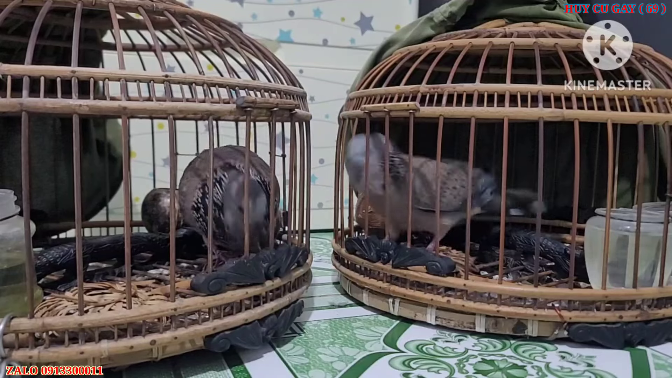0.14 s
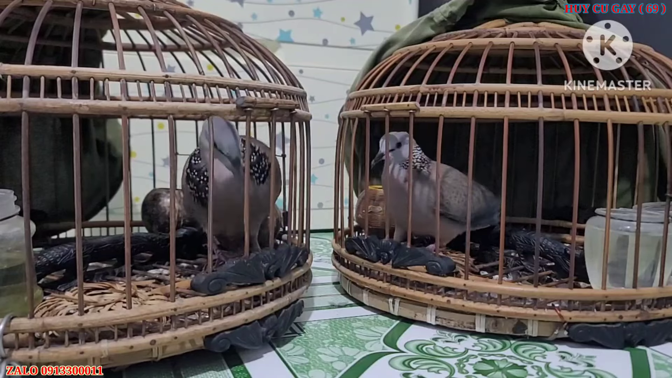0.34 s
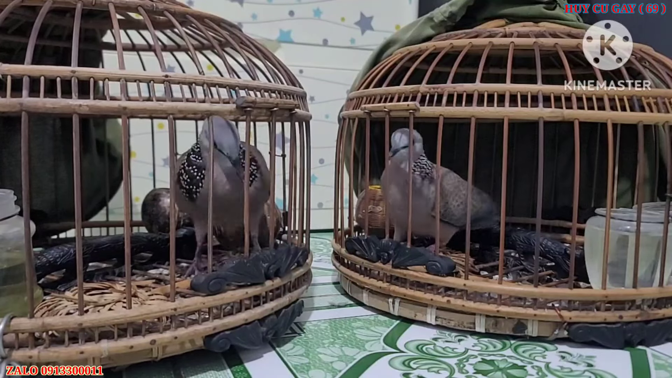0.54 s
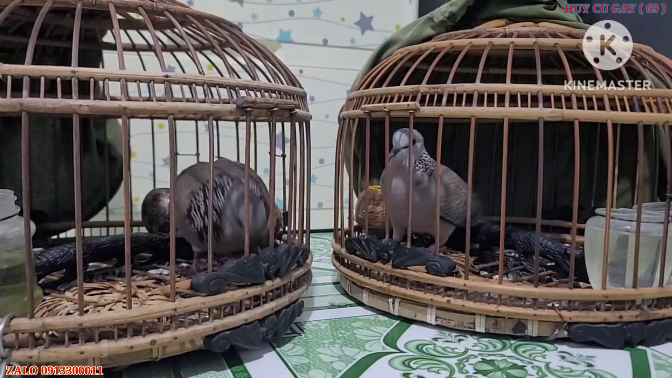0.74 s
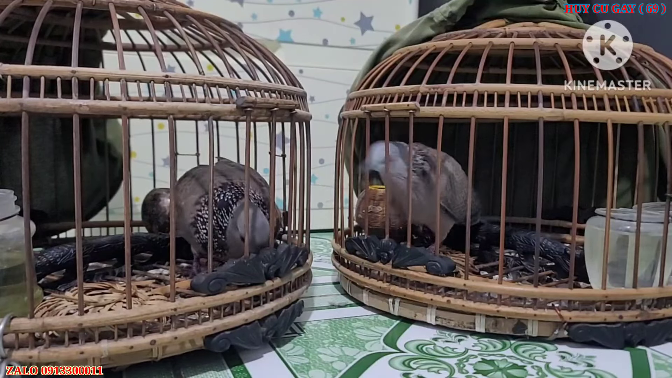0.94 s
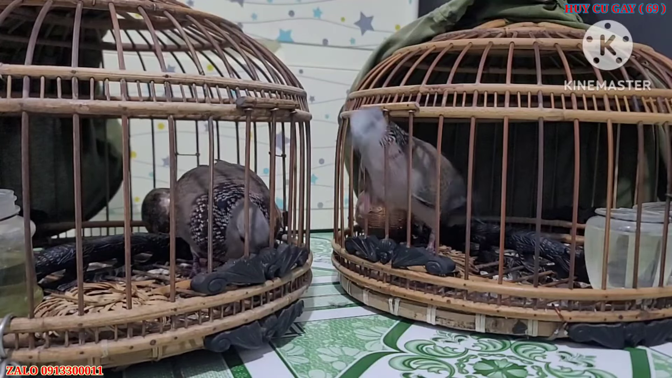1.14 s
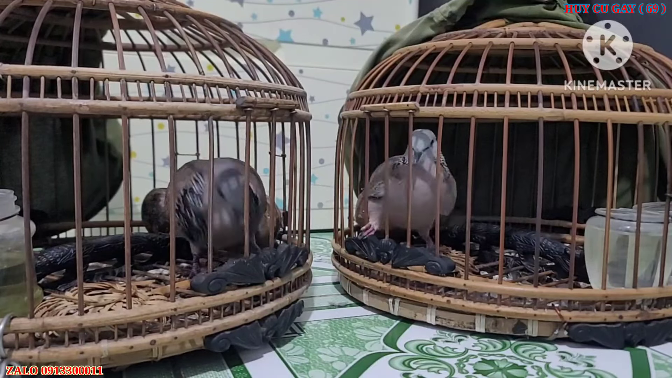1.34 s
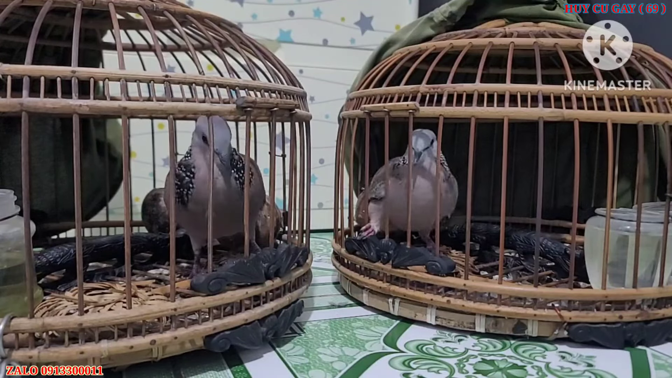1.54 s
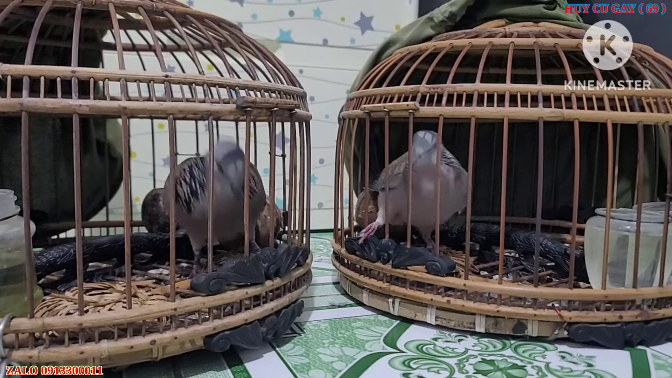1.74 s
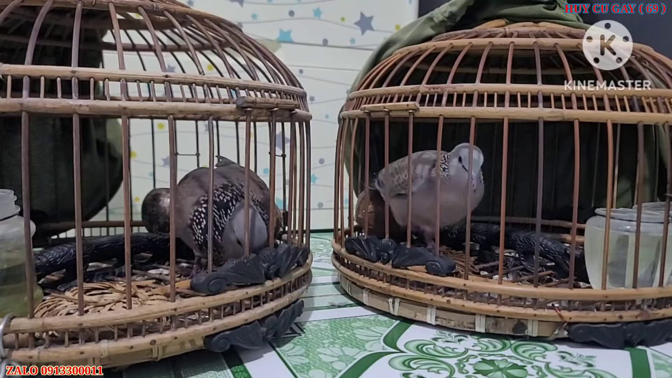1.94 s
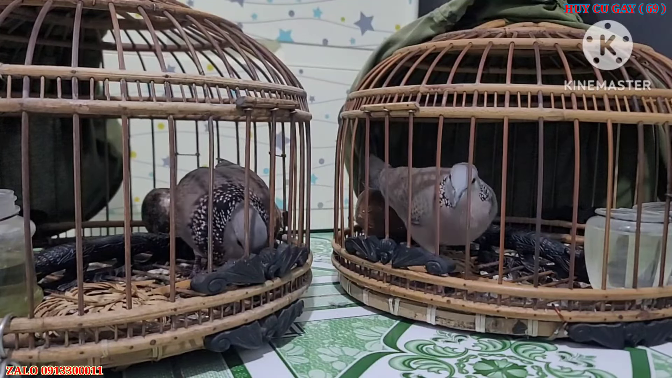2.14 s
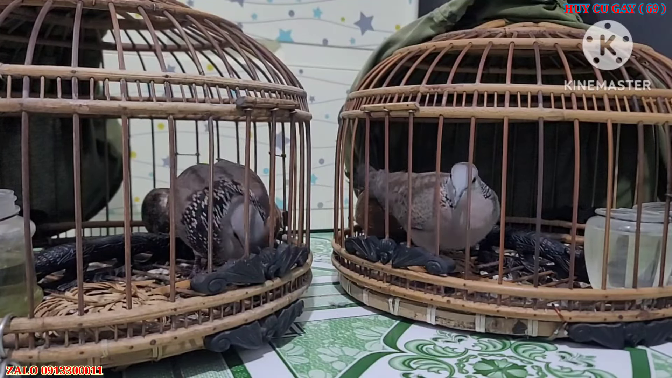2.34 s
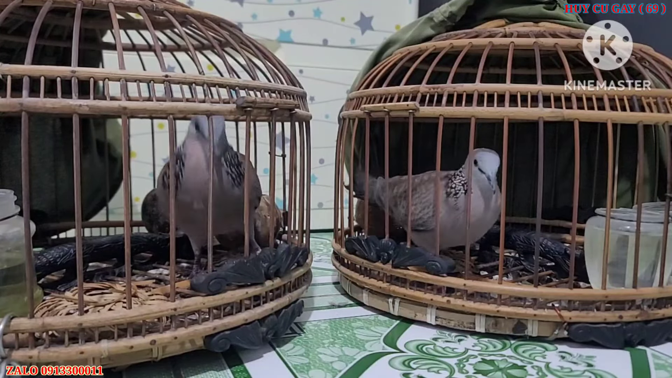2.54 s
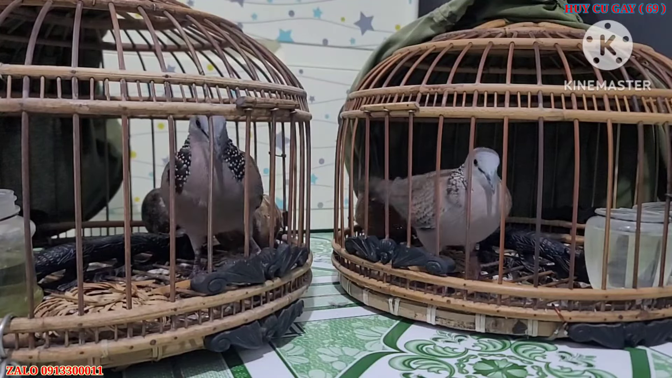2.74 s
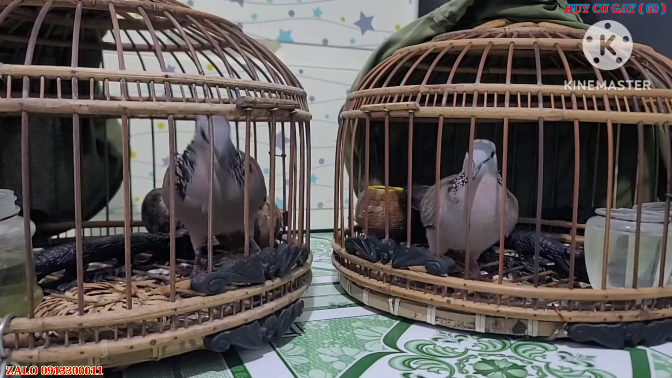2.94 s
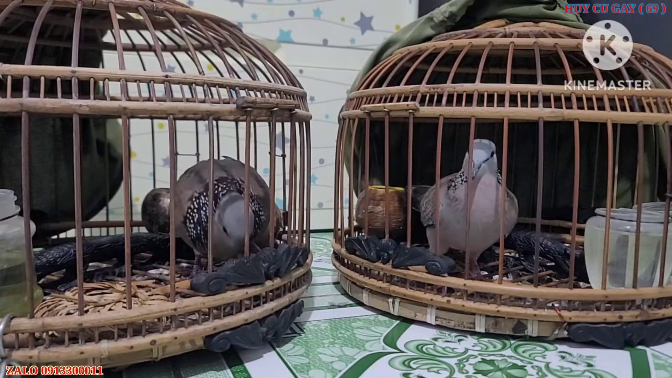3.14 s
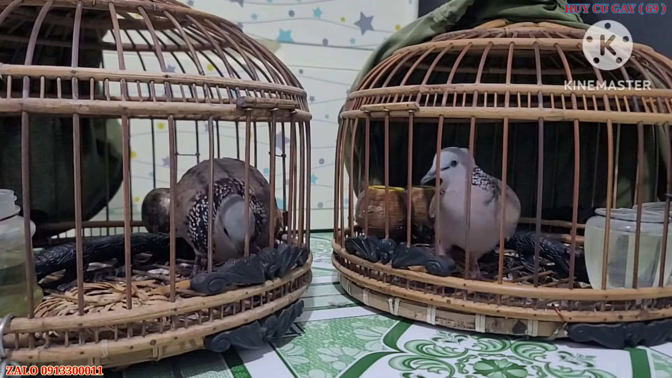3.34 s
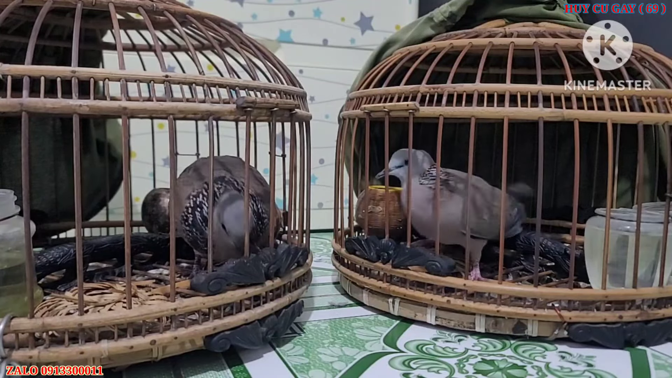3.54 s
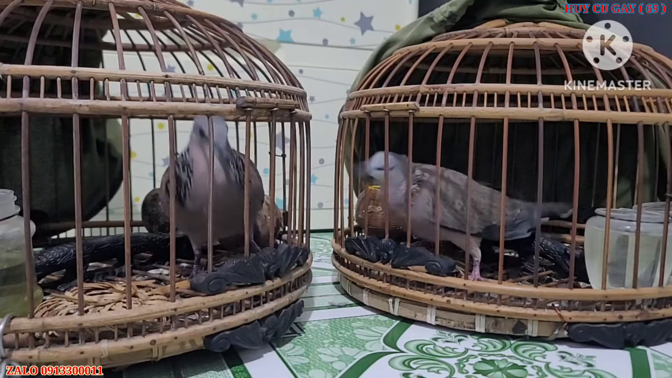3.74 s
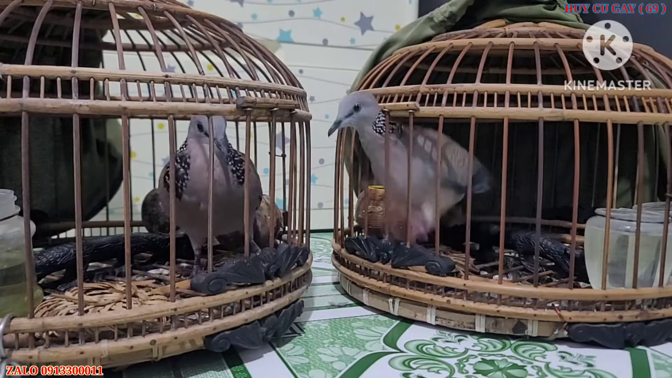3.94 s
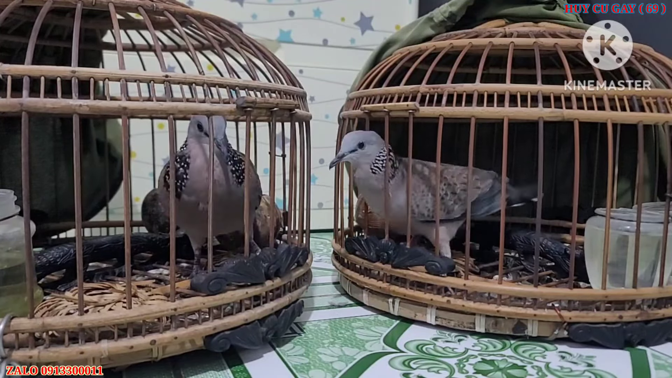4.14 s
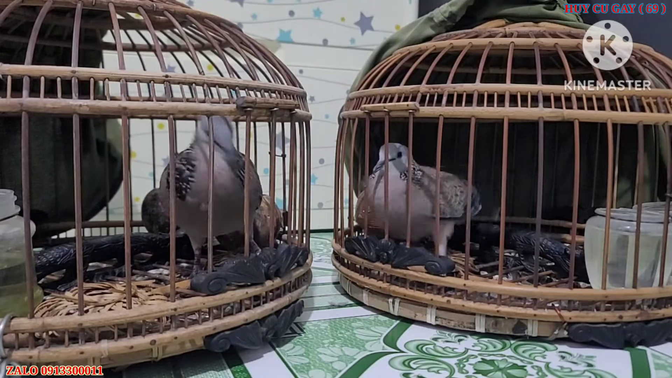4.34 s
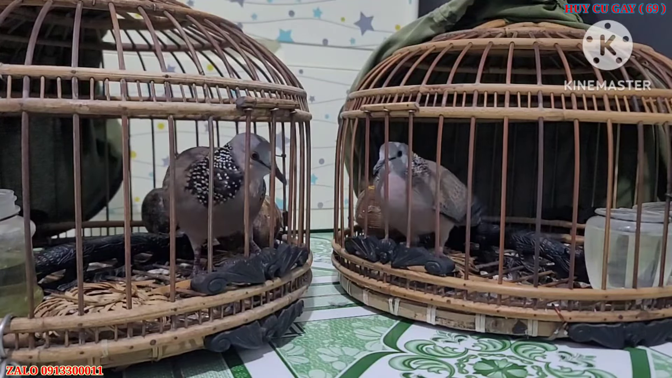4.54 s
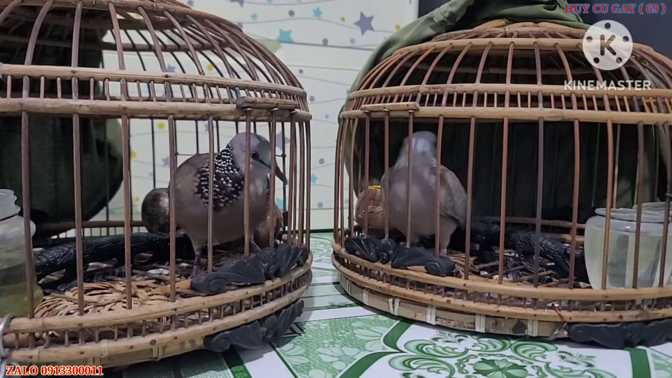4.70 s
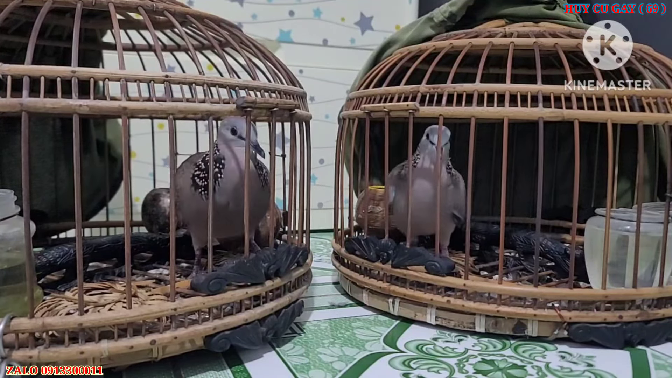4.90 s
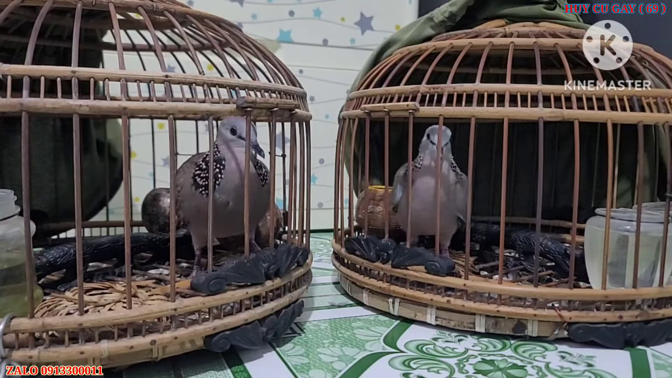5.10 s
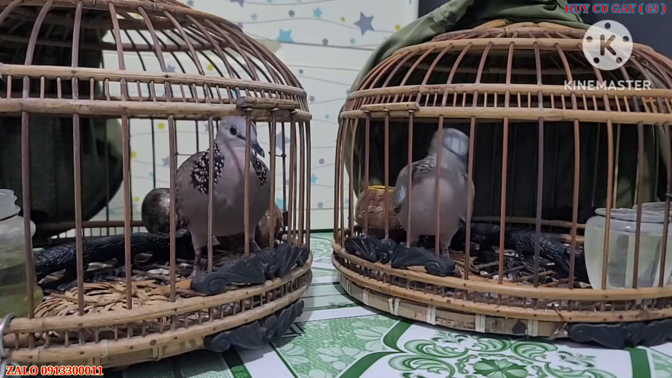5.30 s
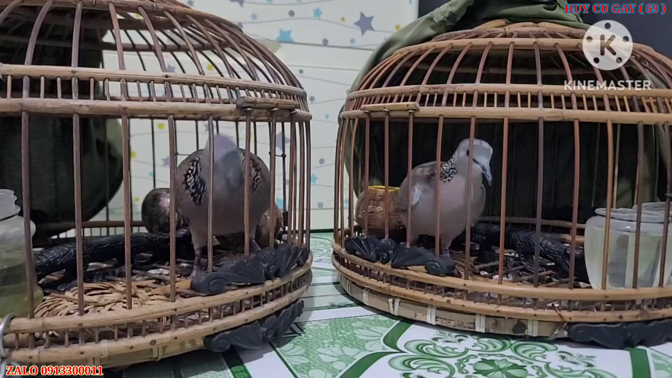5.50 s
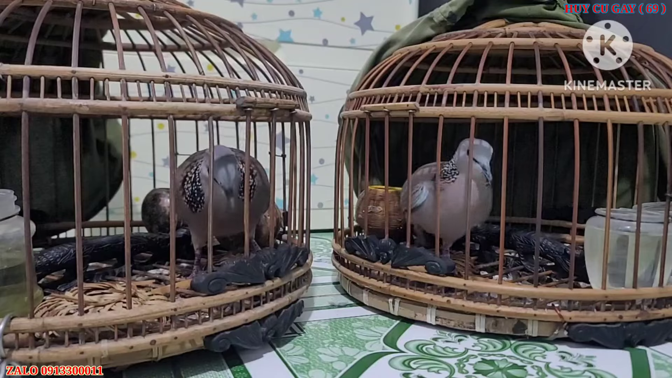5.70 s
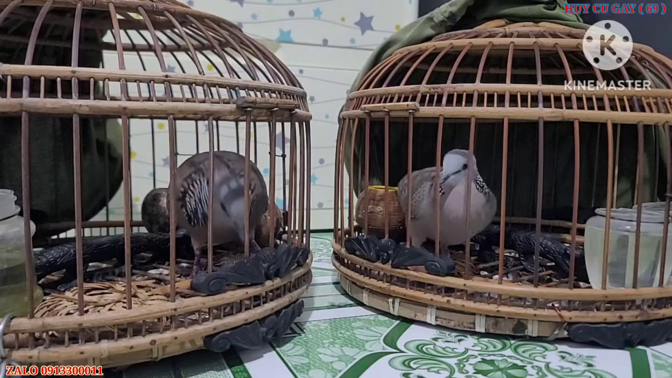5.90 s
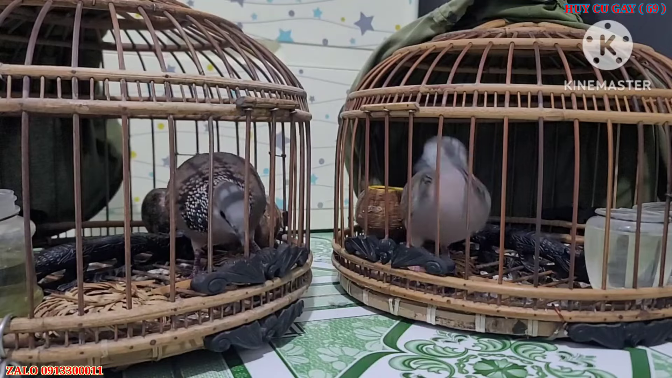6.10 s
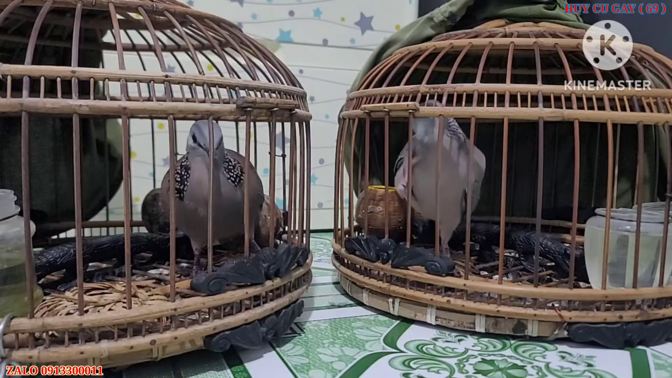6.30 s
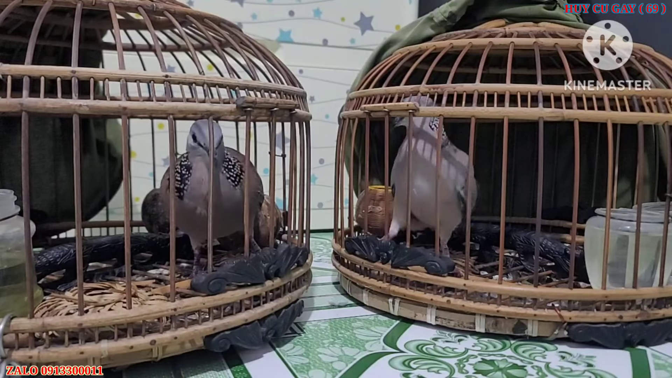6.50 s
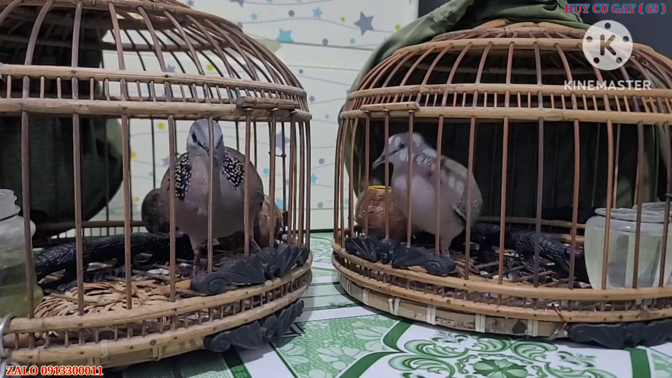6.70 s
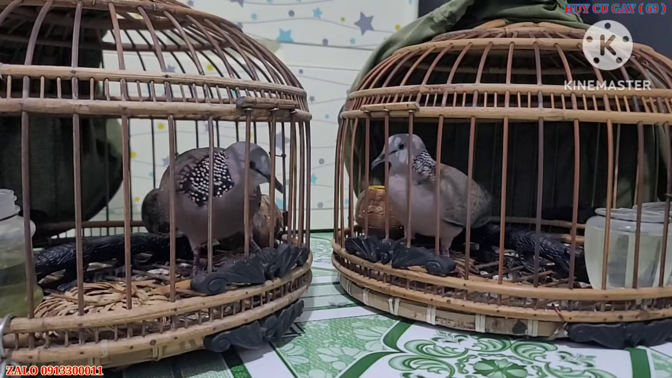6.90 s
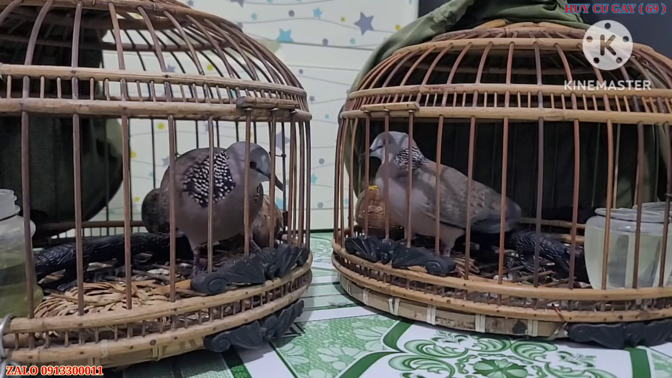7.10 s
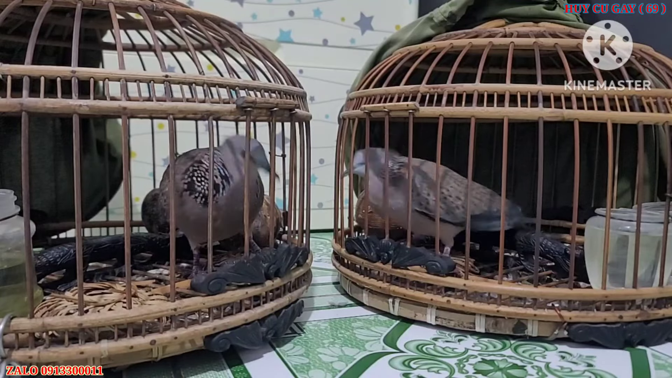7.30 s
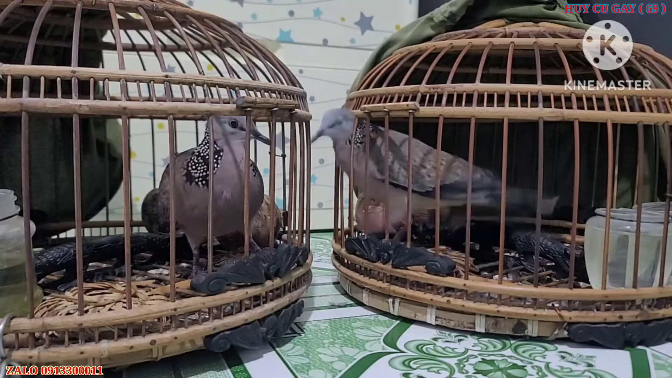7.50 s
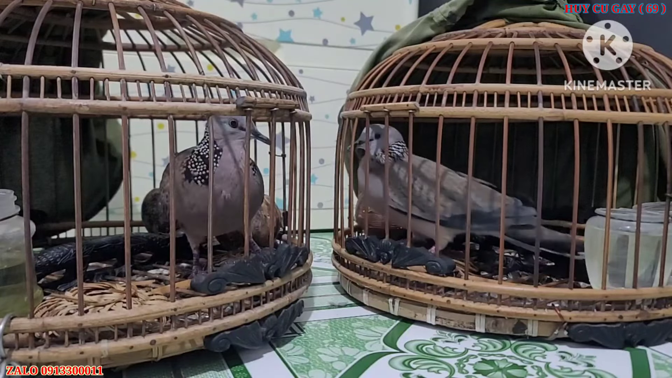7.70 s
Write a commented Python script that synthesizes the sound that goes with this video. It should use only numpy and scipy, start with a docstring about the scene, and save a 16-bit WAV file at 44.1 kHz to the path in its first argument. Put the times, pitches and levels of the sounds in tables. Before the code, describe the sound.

A close, mellow dove voice opens mid-call and repeats short-long purring coos about every 1.2 seconds, with a tiny low hoot before the last long note. After that come a burst of crisp claw ticks, dry feather rustling and dull scuffs. A few reverberant knocks come from across the small indoor space, one sharp. Faint motor hum, whine and airy hiss lie underneath.

```python
"""A spotted dove coos in a bamboo cage in a small hard-walled room, close to a stereo pair of microphones.
Its voice is a rolled near-sine: a short rolled note, then a long one that clears and falls, with a thin whistle.
One soft hoot is a plain sine. Claws tick on the perches and feathers rustle, as filtered noise bursts.
Something clacks farther off, in coloured noise. An appliance hums and whines throughout, over rumble and hiss."""
import sys
import numpy as np
from scipy import signal
from scipy.fft import rfft, irfft, next_fast_len
from scipy.io import wavfile
from scipy.ndimage import uniform_filter1d

SR = 44100
rng = np.random.default_rng(int(sys.argv[2]) if len(sys.argv) > 2 else 0)


def transcribe(u):
    """Save the signal u as a 16-bit wav file named by the first command-line argument.

    u: samples, shape (n,) or (channels, n), limited to [-1, 1]; the rate is SR.
    q: integer samples, one column per channel.
    """
    v = np.clip(np.atleast_2d(u).T, -1, 1)
    q = np.round(v * 32767).astype(np.int16)
    wavfile.write(sys.argv[1], SR, q)


N = 341769
TIME = np.arange(N) / SR

# the short rolled notes, before their glides and swells: start_s, end_s, base_level_db, base_pitch_hz,
# base_breaks_per_s, hard_roll_s (how long it lasts), scoop_hz (how far below its pitch it starts)
SHORT_NOTES = [(.771, .965, -17.5, 774, 99.3, 0.11, 250), (1.902, 2.068, -17, 789, 104, .11, 0),
               (3.115, 3.295, -16.5, 765.7, 96, .095, 250.5)]
# the long notes, likewise: start_s, end_s, base_level_db, base_pitch_hz, base_breaks_per_s, hard_roll_s,
# drop_after_s (from the start of the note), whistle_db
LONG_NOTES = [(-.03, 0.313, -13.5, 846.5, 102, .09, 0.26, -75),
              (1.066, 1.414, -15.5, 837.4, 90, .13, 0.29, -67.5),
              (2.174, 2.521, -15.5, 839.2, 72, .122, .287, -67.5),
              (3.398, 3.721, -15.5, 824, 80, .18, 0.3, -67.5)]
HARD_DEPTH = 0.89   # depth, 0-1, of the roll that starts every note
DROP_S = .006   # width of the pitch drop near the end of every note


def from_db(db):
    """Decibels to gain."""
    return 10 ** (np.asarray(db) / 20)


def rms_one(x):
    """Scale to rms 1."""
    return x / np.sqrt(np.mean(x ** 2) + 1e-20)


def in_time(rows):
    """Each column of a curve, after its time column, at every sample."""
    s, *columns = np.transpose(rows)
    return [np.interp(TIME, s, c) for c in columns]


def at_hz(points, hz):
    """Read a spectrum on a log-frequency axis."""
    point_hz, value = np.array(points).T
    return np.interp(np.log(np.maximum(hz, 1)), np.log(point_hz), value)


def band(x, low_hz, high_hz, order=2):
    """Butterworth band-pass."""
    edges_hz = [low_hz, min(high_hz, SR / 2 - 1000)]
    sos = signal.butter(order, edges_hz, "band", fs=SR, output="sos")
    return signal.sosfilt(sos, x + 1e-18)


def step(t, at_s, width_s):
    """A smooth change from 0 to 1."""
    return .5 + .5 * np.tanh((t - at_s) / (2 * width_s))


def short_note(start, end, db, hz, per_s, roll_s, scoop_hz):
    """A hard roll that eases but never clears; the note swells and rises a little, then its pitch gives way."""
    swell_db_per_s, rise_hz_per_s = 11, 120   # the bird pushes harder as the note goes on
    eased_depth, eased_per_s, ease_s = 0.4, 98, .01
    drop_hz, drop_lead_s = 90.4, 0.016   # just before the end
    t = np.arange(0, end - start, 1 / SR)
    eased = step(t, roll_s, ease_s)
    pitch_hz = hz + rise_hz_per_s * t - drop_hz * step(t, t[-1] - drop_lead_s, DROP_S)
    breaks_per_s = per_s + (eased_per_s - per_s) * eased
    depth = HARD_DEPTH + (eased_depth - HARD_DEPTH) * eased
    return held_note(start, t, db + swell_db_per_s * t, pitch_hz, breaks_per_s, depth, scoop_hz)


def long_note(start, end, db, hz, per_s, roll_s, drop_after_s):
    """A hard roll clears into a swelling, sinking tone with ever rarer breaks, then drops to a low register."""
    swell_db_per_s, sag_hz, sag_power = 8, 143.6, 2.8   # it grows steadily and sinks ever faster
    low_hz, scoop_hz = 638, 208.7
    clear_s, clear_gain_db = 0.0046, 2.5   # the hard roll gives way quickly to a louder tone
    thin_depth, thin_per_s = 0.29, 52   # breaks left just after the tone clears
    last_depth, last_per_s = .17, 26   # breaks at its end
    t = np.arange(0, end - start, 1 / SR)
    cleared = step(t, roll_s, clear_s)
    high_hz = hz - sag_hz * (t / drop_after_s) ** sag_power
    pitch_hz = high_hz + (low_hz - high_hz) * step(t, drop_after_s, DROP_S)
    clear_per_s = np.interp(t, [roll_s, t[-1]], [thin_per_s, last_per_s])
    clear_depth = np.interp(t, [roll_s, t[-1]], [thin_depth, last_depth])
    level_db = db + swell_db_per_s * t + clear_gain_db * cleared
    breaks_per_s = per_s + (clear_per_s - per_s) * cleared
    depth = HARD_DEPTH + (clear_depth - HARD_DEPTH) * cleared
    return held_note(start, t, level_db, pitch_hz, breaks_per_s, depth, scoop_hz)


def held_note(start, t, level_db, pitch_hz, per_s, depth, scoop_hz):
    """Add a soft attack, a slide up and a final slump; loudness follows the throat. Rows as syrinx() reads them."""
    # how well each pitch carries out of the throat: pitch_hz, gain_db
    throat_gain = [(500, -16.5), (600, -8), (640, -6.5), (680, 1.5), (708, 3), (745, -1.5), (800, 0.5),
                   (860, 1)]
    scoop_s, slump_hz, slump_s = .016, 164.7, .012
    attack_db, attack_s = 11.5, 0.0048   # notes start this much softer
    slide_in = scoop_hz * np.exp(-t / scoop_s)
    slump = slump_hz * np.exp((t - t[-1]) / slump_s)
    pitch_hz = pitch_hz - slide_in - slump
    level_db = level_db - attack_db * np.exp(-t / attack_s) + at_hz(throat_gain, pitch_hz)
    return np.column_stack([start + t, level_db, pitch_hz, per_s, depth])


def syrinx():
    """All notes in order: level dB, pitch Hz, breaks per s and depth of the roll at every sample."""
    short = [short_note(*note) for note in SHORT_NOTES]
    long = [long_note(*note[:-1]) for note in LONG_NOTES]
    rows = np.vstack(short + long)
    return in_time(rows[np.argsort(rows[:, 0])])


def roll(pitch_hz, per_s, depth, jitter, gap_s, recover_s, sag, overshoot):
    """The syrinx stalls repeatedly; after each break the tone restarts low and sweeps up. Returns gain, pitch."""
    hurry = np.interp(TIME, np.linspace(0, TIME[-1], 700), rng.standard_normal(700))
    clock = np.cumsum(per_s * np.exp(jitter * hurry)) / SR   # counts the breaks
    since = clock % 1 / per_s
    until = (1 - clock % 1) / per_s
    drag, push = rng.uniform(-1, 1, (2, 2000))[:, clock.astype(int)]   # drawn afresh for each break
    depth = np.clip(depth, 0, 1)
    shut = depth * (2 - depth)   # even a half-hearted stall nearly closes the valve
    opening = 1 - shut * np.exp(-(np.minimum(since, until) / gap_s) ** 2)
    gain = opening * from_db(2.8 * push * depth)
    # no two stalls drag the pitch equally far; after a deep one it climbs past the clear tone
    dragged = sag * np.exp(0.45 * drag) * depth * np.exp(-since / recover_s)
    bend = 1 + overshoot * depth ** 2 - dragged
    steady_gain = gain / np.sqrt(uniform_filter1d(gain ** 2, size=SR // 25))   # breaks cost no average power
    return steady_gain, pitch_hz * bend


def dove(edge_s, octave_db, rasp_db, air_db):
    """A near sine, rolled by the syrinx and rounded by the swollen throat; a trace of octave and rasp escapes."""
    level_db, held_hz, per_s, roughness = syrinx()
    voiced = 0
    for start, end, *_ in [*SHORT_NOTES, *LONG_NOTES]:
        voiced = voiced + np.clip(np.minimum(TIME - start, end - TIME) / edge_s + .5, 0, 1)
    gain, pitch_hz = roll(held_hz, per_s, roughness, jitter=.22, gap_s=0.0019, recover_s=.005,
                          sag=.5, overshoot=0.1)
    flutter = .025 * rms_one(band(rng.standard_normal(N), 40, 160)) * roughness
    phase = 2 * np.pi * np.cumsum(pitch_hz * (1 + flutter)) / SR
    effort = from_db(level_db) * voiced * gain * np.sqrt(2)
    tone = band(effort * np.sin(phase), 468, 888, order=4)
    # the octave lies above the throat's resonance, so it does not swell with the tone
    octave = from_db(octave_db) * voiced * gain * np.sin(2 * phase)
    rasp = from_db(rasp_db) * rms_one(band(rng.standard_normal(N), 420, 1400))
    air = from_db(air_db) * rms_one(band(rng.standard_normal(N), 2000, 7300))
    return tone + octave + effort * (rasp + air) * roughness


def whistles(waver_hz):
    """Air sings very high while the long note is pushed out, sinking with the pressure."""
    after_s, length_s, start_hz, sag_hz_per_s = .04, 0.33, 9150, 2600
    out = np.zeros(N)
    waver = rms_one(band(rng.standard_normal(N), 30, 400))
    for start, *_, db in LONG_NOTES:
        along = np.clip((TIME - start - after_s) / length_s, 0, 1)
        hz = start_hz - sag_hz_per_s * length_s * along + waver_hz * waver
        swell = np.sqrt(8 * along * (1 - along))
        out += from_db(db) * swell * np.sin(2 * np.pi * np.cumsum(hz) / SR)
    return out


def soft_hoot():
    """The dove gives one quiet, low hoot between calls: a sine that swells and fades."""
    at_s, length_s, hoot_hz, hoot_db = 2.86, .1, 390, -47
    along = np.clip((TIME - at_s) / length_s, 0, 1)
    return from_db(hoot_db) * np.sqrt(2) * np.sin(np.pi * along) * np.sin(2 * np.pi * hoot_hz * TIME)


def ticks(decay_s, scuff_s, scuff_db, ring_db, level_db):
    """A claw snaps on bamboo: a bright crack, a short scuff as it slides, and a brief ring."""
    # claws on perch and bars: start_s, peak_db (before level_db), ring_hz
    claw_touches = [(0.185, -42, 5950), (1.31, -38, 5905), (1.4662, -45, 6160), (1.7641, -46, 10300),
                    (1.9985, -42.5, 10540), (3.0343, -43.5, 6540), (3.8835, -41.5, 6900),
                    (3.9563, -25.5, 6510), (4.0462, -38, 9850), (4.074, -31.5, 10600), (4.1105, -36, 8000),
                    (4.2456, -40.5, 6200), (4.3066, -42, 14400), (4.4506, -41, 9100),
                    (4.4764, -31.5, 14100), (6.4464, -40.5, 6750), (6.5725, -40, 6800),
                    (7.5413, -39.5, 6560), (7.7333, -38.5, 12800)]
    faint_per_s, faint_db = 2.7, -50   # lighter touches fall at random, up to this level before level_db
    out, t = np.zeros(N + SR), TIME[:SR // 20]
    lowest, highest = [0, faint_db - 6, 5500], [TIME[-1], faint_db, 11000]
    faint = rng.uniform(lowest, highest, (round(faint_per_s * TIME[-1]), 3))
    touches = np.vstack([claw_touches, faint])
    for (s, db, hz), grit in zip(touches, rng.standard_normal((len(touches), len(t)))):
        contact = grit * (np.exp(-t / decay_s) + from_db(scuff_db) * np.exp(-t / scuff_s))
        crack = band(contact, 3500, 17000)
        tick = crack + from_db(ring_db) * band(crack, hz / 1.1, hz * 1.1)
        out[round(s * SR):][:len(t)] += from_db(db + level_db) * tick / np.abs(tick).max()
    return out[:N]


def rustles(grain_db):
    """Feathers, litter and two dull scuffs sound as short grainy swells of band-passed noise."""
    # feathers and litter, plus two low, dull scuffs that come with the clack at 5.3 s:
    # start_s, length_s, level_db, centre_hz
    brushes = [(0.025, 0.14, -63, 9000), (3.94, 0.25, -57, 10280), (4.473, 0.15, -66, 11000),
               (4.601, 0.12, -54, 1840), (4.94, 0.12, -50.5, 3000), (5.058, 0.071, -57, 2480),
               (5.297, 0.073, -49.5, 620), (5.348, 0.086, -46.5, 1580), (5.596, 0.055, -48.5, 945),
               (6.48, 0.23, -63, 10000), (6.676, 0.53, -61.5, 10900), (7.534, 0.2, -66.5, 8200)]
    out = np.zeros(N)
    grains = rng.standard_normal(N) * from_db(grain_db * rms_one(band(rng.standard_normal(N), 26, 300)))
    for s, length, db, hz in brushes:
        along = np.clip((TIME - s) / length, 0, 1)
        swell = np.sqrt(4 * along * (1 - along))
        out += from_db(db) * swell * rms_one(band(grains, hz / 1.65, hz * 1.65))
    return out


def at_microphones(x, lag_s, pan_db):
    """The sound reaches the right side a little later; pan is left minus right."""
    left = x * from_db(pan_db / 2)
    right = np.interp(TIME - lag_s, TIME, x) * from_db(-pan_db / 2)
    return np.array([left, right])


def room(x, build_s):
    """Diffuse reverberation: it builds up, then dies band by band, differently on each side."""
    # reverberation time of the hard-walled room: frequency_hz, t60_s
    room_t60 = [(200, 1), (700, 0.31), (2000, 0.14), (6000, 0.05), (15000, 0.098)]
    t, tail = TIME[:SR * 2 // 3], 0
    edges = np.geomspace(100, 18000, 11)
    for low, high in zip(edges, edges[1:]):
        noise = band(rng.standard_normal((2, len(t))), low, high)
        tail = tail + noise * 1e-3 ** (t / at_hz(room_t60, np.sqrt(low * high)))
    tail = tail * (1 - np.exp(-(t / build_s) ** 2))
    response = rms_one(tail) / np.sqrt(len(t))
    return signal.fftconvolve(np.atleast_2d(x), response, axes=1)[:, :N]


def stereo_noise(gain_at):
    """Steady noise with the given gain by frequency; the two sides are most alike in the bass; rms 1."""
    # how alike left and right are: frequency_hz, likeness (0-1)
    side_likeness = [(60, 0.98), (240, 0.97), (480, .65), (950, 0.043), (2000, 0.26), (4000, 0),
                     (15000, 0.2)]
    size = next_fast_len(N)
    hz = np.arange(size // 2 + 1) * SR / size
    alike = np.clip(at_hz(side_likeness, hz), -1, 1)
    mid, side = rfft(rng.standard_normal((2, size)))
    pair = np.sqrt(1 + alike) * mid + np.sqrt(1 - alike) * side * [[1], [-1]]
    return rms_one(irfft(gain_at(hz) * pair, size)[:, :N])


def coloured(spectrum):
    """Stereo noise that follows a spectrum table, scaled to rms 1."""
    return stereo_noise(lambda hz: from_db(at_hz(spectrum, hz)))


def narrow_lines(lines):
    """Wavering tones: noise in narrow, steep-sided resonances."""
    def gain_at(hz):
        power = 0
        for centre, width, db in lines:
            power = power + from_db(db) ** 2 / width / (1 + (2 * (hz - centre) / width) ** 2) ** 2
        return np.sqrt(power)

    total = np.sqrt(sum(from_db(db) ** 2 for _, _, db in lines))
    return total * stereo_noise(gain_at)


def clacks(hold_s, body_t60, treble_t60):
    """Something hard lands some way off: a dense cluster of reflections, then a tail whose treble dies first."""
    # clacks across the room: start_s, level_db
    landings = [(4.647, -45.5), (5.302, -37.5), (5.39, -66), (5.939, -25.5), (6.456, -52.5)]
    # their colour: frequency_hz, relative_density_db (per Hz)
    clack_colour = [(150, -17), (300, -10.5), (480, -8), (700, -13), (1000, -13), (1400, -4), (1700, -11),
                    (2000, -7.5), (3300, -16.5), (6500, -21.5), (9000, -27.5), (15000, -33)]
    noise = coloured(clack_colour)
    body = signal.sosfilt(signal.butter(1, 5000, fs=SR, output="sos"), noise)
    treble = noise - body

    def envelope(t60):
        power = 0
        for s, db in landings:
            fallen_db = 60 * np.maximum(TIME - s - hold_s, 0) / t60
            power = power + from_db(2 * (db - fallen_db)) * (TIME >= s)
        return np.sqrt(power)

    return body * envelope(body_t60) + treble * envelope(treble_t60)


def background(rumble_trim_db, hiss_trim_db):
    """The appliance's hum and whine, wavering lines over a steady sine, with the room's rumble and hiss."""
    # room noise, before the trims, rising briefly at 6.5 s with the low thump of a landing: time_s, rumble_db,
    # hiss_db
    air_levels = [(0.0, -46, -57), (0.45, -45.5, -63.5), (3.71, -46, -61), (4.01, -41.5, -60.5),
                  (6.17, -47.5, -61.5), (6.5, -37.5, -61.5), (6.56, -44.5, -60.5), (7.75, -45.5, -61.5)]
    # colour of the rumble: frequency_hz, relative_density_db (per Hz)
    rumble_colour = [(25, -34.5), (40, -20), (55, -6), (75, -5), (100, -10), (122, -13), (145, -7),
                     (178, 0), (205, -4.5), (230, -15), (330, -15.5), (500, -40.5), (900, -85)]
    # colour of the hiss: frequency_hz, relative_density_db (per Hz)
    hiss_colour = [(260, -9), (380, 2.5), (520, 0), (800, -2.5), (1400, -2), (1750, -9), (2300, -8.5),
                   (3000, -11.5), (3700, -17), (5000, -16.5), (5700, -25.5), (7400, -22), (8000, -35),
                   (15000, -38.5)]
    # hum of the motor: centre_hz, width_hz, level_db
    motor_hum = [(58.7, 8, -56), (97.8, 2.8, -53), (201.8, 4, -52.5), (357.4, 27, -57), (520, 9.4, -64.5),
                 (555, 3.4, -59)]
    # its high ringing: centre_hz, width_hz, level_db
    motor_whine = [(2025, 50, -61), (2120, 140, -53.5), (2216.5, 71, -50)]
    hum_hz, hum_db = 61.9, -53   # steady low hum
    rumble_db, hiss_db = in_time(air_levels)
    rumble = from_db(rumble_db + rumble_trim_db) * coloured(rumble_colour)
    steady_hum = from_db(hum_db) * np.sqrt(2) * np.sin(2 * np.pi * hum_hz * TIME)
    hiss = from_db(hiss_db + hiss_trim_db) * coloured(hiss_colour)
    return rumble + hiss + steady_hum + narrow_lines(motor_hum) + narrow_lines(motor_whine)


def scene():
    """The dove and the small noises close by, their reverberation, and the far sounds of the room."""
    coos = dove(edge_s=.013, octave_db=-52, rasp_db=-36, air_db=-54)
    voice = from_db(0.37) * coos + soft_hoot() + whistles(waver_hz=180)
    claws = ticks(decay_s=0.0019, scuff_s=0.011, scuff_db=-13.0, ring_db=3, level_db=2.0)
    brushing = rustles(grain_db=3.0)
    near_voice = at_microphones(voice, lag_s=.00013, pan_db=-1.5)
    near_noises = at_microphones(claws + brushing, lag_s=.00002, pan_db=1)
    wet = room(from_db(-15.5) * voice + from_db(-4.5) * claws + brushing, build_s=.007)
    far = clacks(hold_s=0.028, body_t60=0.43, treble_t60=0.38)
    far = far + background(rumble_trim_db=1.1, hiss_trim_db=14.0)
    balance = from_db([[-.45], [.45]])   # left, right
    return (near_voice + near_noises + wet + far) * balance


def record(dry):
    """The top is cut steeply by an elliptic low-pass."""
    cutoff_hz = 15600
    return signal.sosfilt(signal.ellip(10, .1, 90, cutoff_hz, fs=SR, output="sos"), dry)


dry = scene()
out = record(dry)
transcribe(out)
```